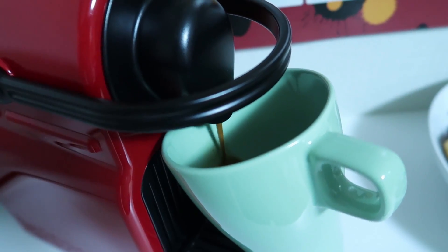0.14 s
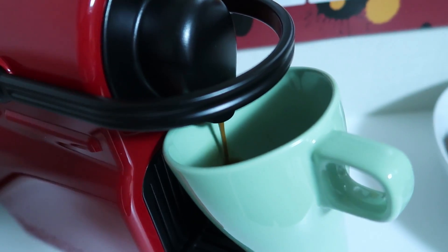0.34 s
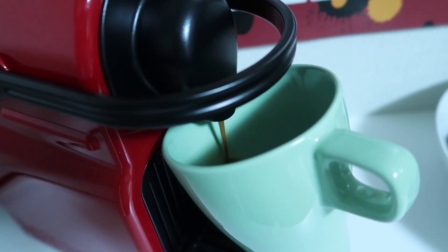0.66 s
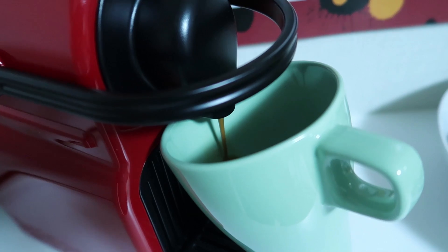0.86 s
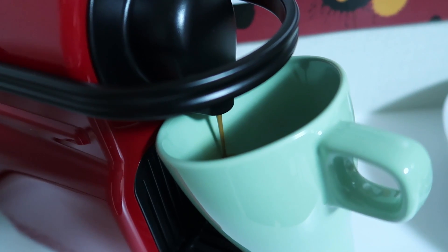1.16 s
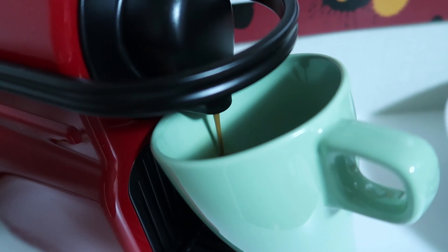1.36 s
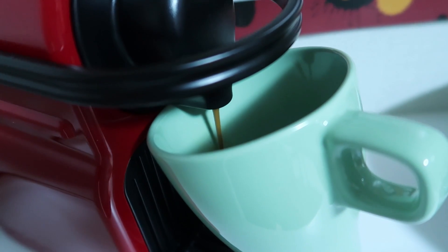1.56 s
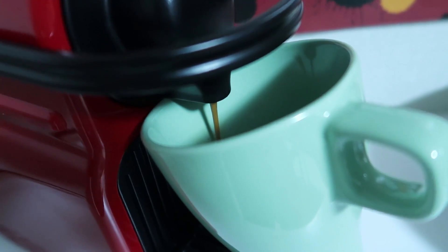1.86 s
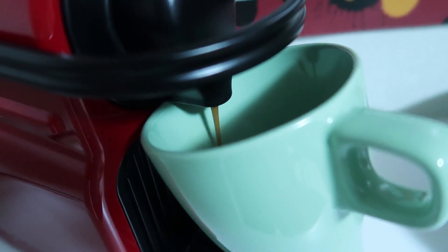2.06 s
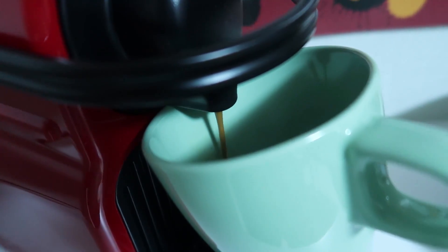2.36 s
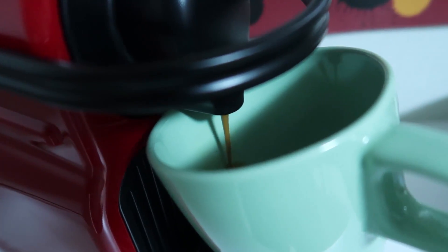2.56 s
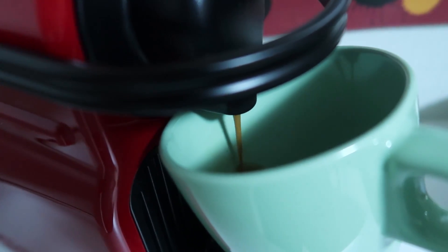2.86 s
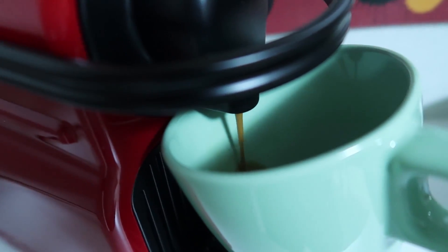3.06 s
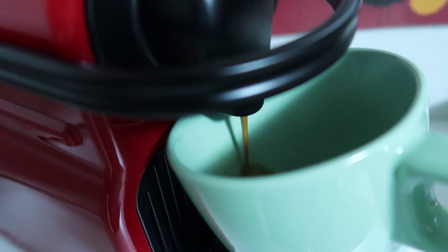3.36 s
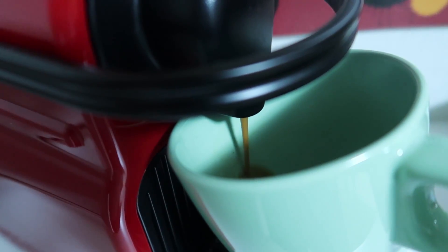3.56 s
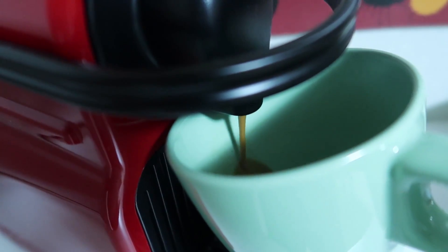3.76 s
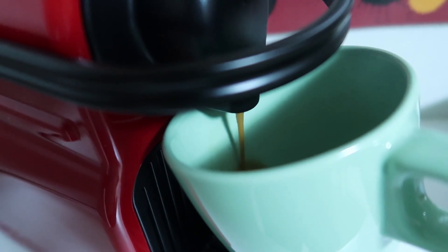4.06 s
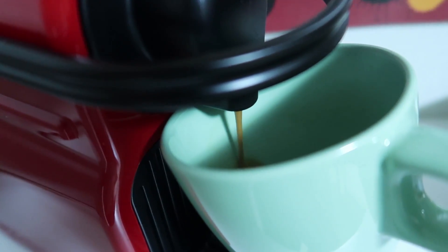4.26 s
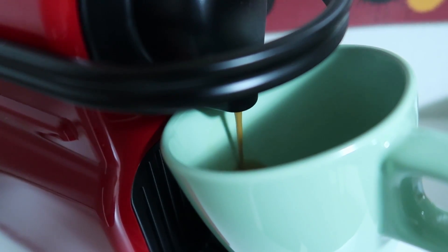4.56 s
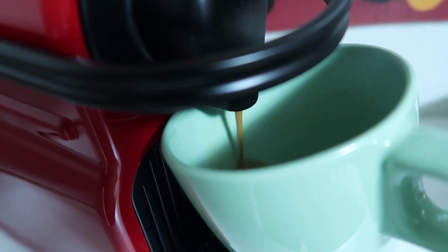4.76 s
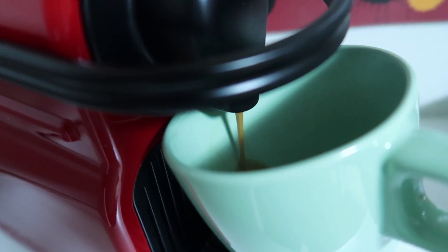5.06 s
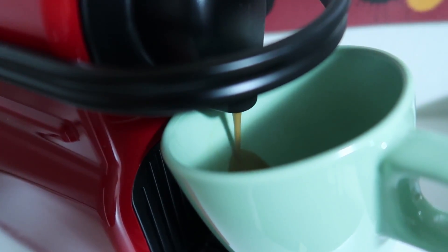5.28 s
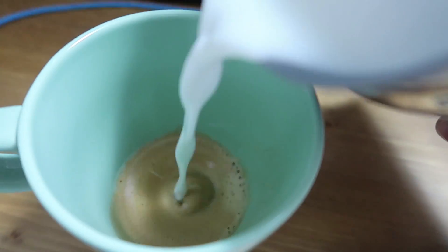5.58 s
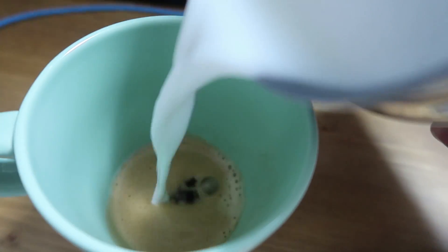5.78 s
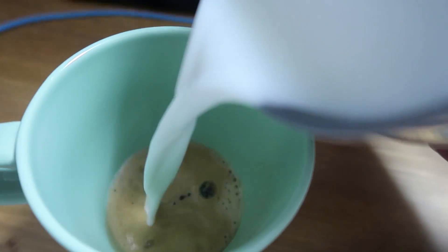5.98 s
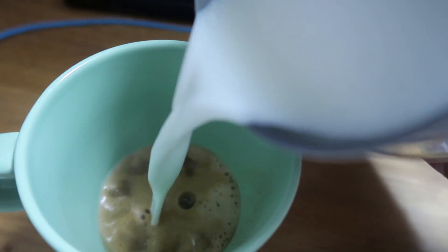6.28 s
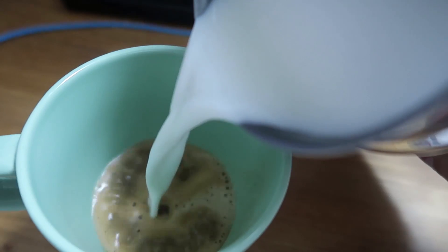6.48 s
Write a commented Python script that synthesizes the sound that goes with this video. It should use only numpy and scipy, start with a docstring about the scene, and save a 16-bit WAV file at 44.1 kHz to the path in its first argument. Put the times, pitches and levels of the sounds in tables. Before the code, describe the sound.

Close vibrating pump drone, rattling and hissing as coffee trickles into a mug; sudden cut to a hushed table, hollow knock, bubbly milk pouring.

```python
"""Capsule espresso, then milk.

A machine brews into a mug as the microphone creeps closer: the mains-driven piston pump sums sine harmonics
for hum and housing buzz, and noise gated per stroke for clatter and hiss; coffee gurgles as tone and spray, and spits.
Hard cut to a quiet kitchen table: milk plops into the coffee as rising bubble tones with noise splashes,
and a hollow knock bounces as decaying modes, over room tone."""
import sys
import numpy as np
from scipy import signal
from scipy.fft import rfft, irfft, next_fast_len
from scipy.io import wavfile

SR = 44100
rng = np.random.default_rng(int(sys.argv[2]) if len(sys.argv) > 2 else 0)


def unload_audio(sound):
    """Save the sound as a 16-bit wav file, at the path given as the first command line argument."""
    columns = np.transpose(np.atleast_2d(sound))
    # keep every value between -1 and 1, then stretch to whole-number steps
    steps = np.round(np.clip(columns, -1, 1) * 32767)
    wavfile.write(sys.argv[1], SR, steps.astype(np.int16))


N = 292383
T = np.arange(N) / SR
EARS = np.array([[1], [-1]])   # opposite sign in left and right

MAINS_HZ = 50.017   # one piston stroke per cycle
CUT_S, CUTOFF_HZ = 5.4513, 14800
FUNDAMENTAL_DB, ROOM_DB = -46.5, -46
SETTLE_S = 0.32   # time constant: pump labours, then settles as pressure builds
GURGLE_ATTACK_S, GURGLE_RELEASE_S = 0.019, 0.088
STREAM_DB = -48   # smooth stream between bouts
GUSH_ATTACK_S, GUSH_RELEASE_S = 0.02, 0.04
TRICKLE_DB = -70   # thin run between gushes
# small bubbles in a gush; level is relative to the patter
SMALL_BUBBLES_PER_S, SMALL_BUBBLE_DB, SMALL_SPREAD_DB = 30, 16, 2
SMALL_BUBBLE_HZ, SMALL_SPREAD_OCTAVES = 1180, 0.15

# microphone path: time_s, closeness_0_to_1
APPROACH = [(0, 0.12), (1.7, 0.43), (2.8, 0.66), (3.6, 0.82), (5.4, 0.86)]
# side over mid, machine: freq_hz, side_minus_mid_db
MACHINE_WIDTH = [(60, -52), (130, -45), (300, -14), (700, -16.5), (1400, -9), (2900, -8.5), (5000, -6),
                 (7000, -2), (9500, 2.5), (13000, 5)]
# side over mid, table: freq_hz, side_minus_mid_db
TABLE_WIDTH = [(60, -21), (110, -27), (200, -12), (370, -5), (670, -8), (1230, -2), (2240, -5), (4100, 0),
               (7490, 0.5), (13700, 6)]
# pump at twice the stroke rate: settled_far_db, start_gain_db, near_gain_db
DRONE_LEVELS = (-29, 4.8, -0.3)
# pump at four times the stroke rate: settled_far_db, start_gain_db, near_gain_db
HUM_LEVELS = (-21, 1.5, 1.9)
# clatter before trim: settled_far_db, start_gain_db, near_gain_db
CLATTER_LEVELS = (-35.5, 4, -0.76)
# hiss before trim: settled_far_db, start_gain_db, near_gain_db
HISS_LEVELS = (-39.5, 6, -9.5)
# weaker hum partials: stroke_rate_multiple, far_db, near_gain_db
WEAK_PARTIALS = [(3, -40.5, 1), (5, -46.5, 6.5), (6, -43.5, 4)]
# housing panels, each radiating in a lobe: freq_hz, width_hz, peak_db, loudest_closeness_0_to_1, off_lobe_loss_db
PANELS = [(349.6, 13, -39.5, 0.19, 8), (446.4, 36, -38, 0.76, 14.5), (504, 9.7, -28, .0, 11.5),
          (549.3, 17, -42, 0.54, 2), (600, 23, -37.5, 0, 19), (700, 22, -41.5, 0.22, 9),
          (750, 10, -40, 0.29, 15.5), (893, 17, -37, 0.54, 19), (955.5, 5.8, -36.5, 0.5, 2),
          (997.8, 5.7, -34.5, 0.15, 7), (1143, 47, -42.5, 0.19, 11), (1249, 51, -43, 0.61, 13.5),
          (1400, 20, -41, 0.21, 34), (1452, 11, -45, 1, 12), (1502, 70, -50, 1, 2),
          (1700, 12, -39.5, 0.46, 11), (1767, 39, -37, 0.26, 23), (1850, 64, -44, 0.37, 3),
          (2054, 34, -39.5, 0.23, 17), (2107, 36, -43, 0.85, 24), (2220, 51, -41.5, 0.75, 9.5),
          (2700, 17, -50, 0.44, 9)]
# pump clatter spectrum: freq_hz, relative_db_per_hz
CLATTER_SPECTRUM = [(25, -19.5), (60, 1), (200, -2), (370, -3.5), (480, 3.5), (800, -1), (930, 4),
                    (1080, -1.5), (1700, -0.5), (2200, -1.5), (2550, -5), (3300, -17), (4200, -18.5),
                    (8000, -53)]
# spectrum of water forced through the valve: freq_hz, relative_db_per_hz
HISS_SPECTRUM = [(800, -27), (2500, 2), (3000, 7.5), (4000, -1.5), (5400, -2), (6200, -8), (7400, -6),
                 (8400, -8.5), (9600, -11), (11200, -7.5), (12800, -11.5), (13600, -20), (15000, -33)]
# spout resonances excited by the hiss: freq_hz, width_hz, relative_db
SPOUT_MODES = [(3970, 70, -1.5), (4600, 130, -3), (5100, 110, -4.5), (5720, 110, -4), (7100, 130, -3.5),
               (7520, 64, -5), (11050, 60, -8), (12500, 200, -9)]
# loose parts shaken at the start: freq_hz, width_hz, start_db
LOOSE_PARTS = [(209, 14, -41), (455, 59, -79), (904, 10.4, -34), (1576, 36, -31)]
# coffee stream bouts: start_s, length_s, level_db, pitch_hz
GURGLES = [(0.916, 0.36, -42.5, 2985), (1.676, 0.28, -42.5, 2833), (2.132, 0.23, -41, 2852),
           (2.441, 0.167, -38.5, 2890), (3.129, .7, -40.5, 2976), (3.918, 0.1193, -40.5, 3050),
           (4.347, 0.2866, -44, 3045), (4.732, 0.35, -41.5, 3074)]
# spray around the stream tone: freq_hz, relative_db_per_hz
SPRAY_SPECTRUM = [(2000, -36.5), (2600, -7), (3000, -0.5), (3500, -2.5), (4200, -24), (6000, -28)]
# air spitting from the spout: start_s, peak_db
SPITS = [(0.1087, -43), (1.507, -35), (1.6467, -34), (1.8267, -35.5), (2.1066, -36.5), (2.185, -43),
         (2.7055, -31.5), (2.7862, -34), (3.9495, -41), (4.0041, -36.5), (4.907, -42)]
# spit puffs: freq_hz, relative_db_per_hz
SPIT_SPECTRUM = [(2000, -18), (4200, 6), (6000, 1.5), (9000, -8), (13000, -23), (15000, -24)]
# room tone: freq_hz, relative_db_per_hz
ROOM_SPECTRUM = [(20, -14), (35, -3), (50, -6), (65, -2), (95, -18), (135, -1), (175, -1.5), (230, -9.5),
                 (380, -9.5), (550, -18), (800, -16), (1650, -26), (3760, -31.5), (9500, -41.5),
                 (14000, -45)]
# loudest milk plops, levels before trim: start_s, bubble_db, bubble_hz, splash_db
PLOPS = [(5.632, -36, 1110, -45), (5.702, -30, 1290, -37), (5.733, -36, 1950, -36), (5.751, -30, 1090, -46),
         (5.7875, -24, 1250, -44), (5.794, -35, 1000, -42), (5.817, -34, 1310, -47),
         (5.837, -31, 1120, -48), (6.025, -35, 1100, -49), (6.046, -28.5, 1220, -47),
         (6.097, -39, 1080, -49), (6.118, -31, 1240, -49), (6.192, -34, 1100, -41), (6.265, -37, 1110, -50),
         (6.393, -31.5, 1090, -49), (6.470, -29.5, 1110, -42.5), (6.486, -36, 1190, -52),
         (6.5014, -29.5, 1050, -45), (6.5355, -23, 1160, -42.5)]
# milk splashes: freq_hz, relative_db_per_hz
SPLASH_SPECTRUM = [(900, 1), (1500, 6), (2100, -4), (2700, 6), (3250, 7), (3900, -21),
                   (7000, -25), (14000, -27)]
# milk leaving the jug: start_s, length_s, patter_db
GUSHES = [(5.73, 0.15, -57), (6.009, .11, -59), (6.157, .04, -59), (6.36, .04, -60), (6.457, .09, -56),
          (6.595, 0.031, -57)]
# air modes of the mug: freq_hz, width_hz, relative_db
MUG_MODES = [(1110, 140, 4), (1310, 150, 12), (1540, 200, -3), (2630, 350, -11), (3070, 240, -6.5)]
# knock and its bounces: start_s, relative_db, favoured_hz
KNOCKS = [(5.69, -10, 950), (5.722, -23, 750), (5.7337, -21, 330), (5.756, -25.5, 674)]
# modes the knock rings: freq_hz, relative_db, t60_s
KNOCK_MODES = [(139, -16.5, 0.39), (162.5, -21, 0.77), (352, -11, 0.28), (417, -14.5, 0.14),
               (644, -5, 0.11), (717, -8, 0.12), (712, -14, 0.13), (800, 1.5, 0.0087), (915, -13, 0.036),
               (960, -23, .03), (1075, 4.5, .012), (1166, -13, 0.082), (1240, -15, 0.028),
               (1380, -27, 0.13), (1900, -23, .15), (2013, -34, 0.13)]
# sharp click of the knock: freq_hz, relative_db_per_hz
CRACK_SPECTRUM = [(500, 9), (1500, 12), (3500, 0), (6000, -1.5), (10000, -8), (14000, -5)]


def from_db(db):
    """Decibels to gain."""
    return 10 ** (np.asarray(db) / 20)


def rms_one(x):
    """Scale to rms 1."""
    return x / np.sqrt(np.mean(x ** 2) + 1e-20)


def in_time(rows):
    """Each column of a curve at every sample."""
    time_s, *columns = np.transpose(rows)
    return [np.interp(T, time_s, column) for column in columns]


def at_hz(points, hz):
    """Read a spectrum on a log-frequency axis."""
    known_hz, values = np.transpose(points)
    return np.interp(np.log(hz + 1), np.log(known_hz), values)


def drift(rate_hz):
    """Slow chance with spread 1: low-passed noise at 1/40 of the sample rate, interpolated."""
    r = np.exp(-80 * np.pi * rate_hz / SR)
    noise = rng.standard_normal(N // 40 + 2002)
    slow = signal.lfilter([1], [1, -2 * r, r * r], noise)[2000:]   # drop the filter's start-up
    return np.interp(np.arange(N) / 40, np.arange(len(slow)), rms_one(slow))


def resonance(x, hz, width_hz):
    """Two-pole resonance with gain 1 on top."""
    r = np.exp(-np.pi * width_hz / SR)
    zeros = np.array([1, 0, -1]) * (1 - r * r) / 2
    poles = [1, -2 * r * np.cos(2 * np.pi * hz / SR), r * r]
    return signal.lfilter(zeros, poles, x + 1e-18)


def ring(hits, hz, t60_s):
    """A unit click sets a decaying sine of height 1 ringing."""
    r, w = from_db(-60 / (t60_s * SR)), 2 * np.pi * hz / SR
    return signal.lfilter([0, np.sin(w)], [1, -2 * r * np.cos(w), r * r], hits + 1e-18)


def band(x, low_hz, high_hz):
    """Gentle band-pass."""
    sos = signal.butter(2, [low_hz, min(high_hz, 0.45 * SR)], "band", fs=SR, output="sos")
    return signal.sosfilt(sos, x + 1e-18)


def stereo_noise(spectrum, width):
    """Coloured noise, mid and side mixed by frequency; rms 1."""
    size = next_fast_len(N)
    hz = np.arange(size // 2 + 1) * SR / size
    mid, side = rfft(rng.standard_normal((2, size))) * from_db(at_hz(spectrum, hz))
    spread = from_db(at_hz(width, hz))
    both = (mid + spread * side * EARS) / np.sqrt(1 + spread ** 2)
    return rms_one(irfft(both, size)[:, :N])


def clicks(times_s, levels_db):
    """One click for each event."""
    out = np.zeros(N)
    out[np.round(np.asarray(times_s) * SR).astype(int)] = from_db(levels_db)
    return out


def dying(x, t60_s):
    """Each click becomes an envelope that dies away."""
    return signal.lfilter([1], [1, -from_db(-60 / (t60_s * SR))], x + 1e-18)


def stroke_gate(peak_turn, depth_db, uneven_db):
    """A swell once per piston stroke, each of its own strength; rms 1."""
    turn = T * MAINS_HZ - peak_turn
    strength = rng.standard_normal(int(turn[-1]) + 4)[np.round(turn).astype(int) + 1]
    swell = ((1 + np.cos(2 * np.pi * turn)) / 2) ** 2
    return rms_one(from_db(swell * (depth_db + uneven_db * strength)))


def bouts(rows, attack_s, release_s, between_db):
    """Gain of a flow that swells, holds and falls back once per row."""
    gain = from_db(between_db) * np.ones(N)
    for start_s, length_s, level_db, *_ in rows:
        rise = (T - start_s) / attack_s
        fall = 1 - (T - start_s - length_s) / release_s
        gain = np.maximum(gain, from_db(level_db) * np.clip(np.minimum(rise, fall), 0, 1))
    return gain


def kitchen(x, t60_s, dull_hz):
    """Diffuse reflections: decaying band-passed noise, slightly different in each ear."""
    age_s = T[:SR // 2]
    noise = band(rng.standard_normal((2, SR // 2)), 150, dull_hz)
    mid, side = noise * from_db(-60 * age_s / t60_s)
    tail = (mid + 0.087 * side * EARS) * np.minimum(age_s / 0.0034, 1)
    tail = tail / np.sqrt(np.sum(tail ** 2) / 2)
    return signal.fftconvolve(x[None], tail, axes=1)[:, :N]


def pump_level(levels_db, closeness):
    """Level in dB: falls as the pump settles, changes as the microphone nears."""
    settled_db, start_db, near_db = levels_db
    return settled_db + start_db * np.exp(-T / SETTLE_S) + near_db * closeness


def hum(closeness, sway_db, ear_turn, beat_s, trough_s, beat_db):
    """Shaking pump body: mains multiples 2 and 4 lead; the fundamental swells and sinks."""
    def partial(multiple, db, apart_turn=0):
        turns = multiple * MAINS_HZ * T + rng.random() + apart_turn * EARS
        return from_db(db) * np.sqrt(2) * np.cos(2 * np.pi * turns)

    beat = -beat_db * np.cos(2 * np.pi * (T - trough_s) / beat_s)
    body = partial(1, FUNDAMENTAL_DB + beat)
    body = body + partial(2, pump_level(DRONE_LEVELS, closeness))
    body = body + partial(4, pump_level(HUM_LEVELS, closeness), ear_turn)
    for multiple, far_db, near_db in WEAK_PARTIALS:
        body = body + partial(round(multiple), far_db + near_db * closeness + sway_db * drift(1.9))
    return body


def housing(closeness, lobe, strike_turn, scatter_turn, rough, end_multiple):
    """Strokes shake the panels into mains harmonics; the microphone passes through the panels' lobes."""
    hz, width_hz, db, best, lost_db = np.transpose(PANELS)[:, :, None]
    path = np.linspace(0, 1, 40)
    heard = from_db(db - lost_db * (1 - np.exp(-((path - best) / lobe) ** 2)))
    out, lag_turn = 0, 0
    for multiple in range(7, end_multiple):
        response = 1 / (1 + (2 * (multiple * MAINS_HZ - hz) / width_hz) ** 2)
        gain = np.sqrt(np.sum(heard ** 2 * response ** 1.04, axis=0))
        # each harmonic peaks at its own moment of the stroke
        lag_turn += strike_turn + scatter_turn * rng.standard_normal()
        tone = np.cos(2 * np.pi * (multiple * MAINS_HZ * T - lag_turn))
        out = out + np.interp(closeness, path, gain) * tone
    return np.sqrt(2) * out * (1 + rough * drift(48))


def clatter(closeness):
    """Broadband pump noise, swelling unevenly on every stroke."""
    level_db = pump_level(CLATTER_LEVELS, closeness) + 1.5 + 0.51 * drift(8.7)
    noise = stereo_noise(CLATTER_SPECTRUM, MACHINE_WIDTH)
    return from_db(level_db) * noise * stroke_gate(0.42, 1.7, 0.87)


def spout(noise, ring_db):
    """Narrow spout resonances stand out of the noise."""
    rings = sum(from_db(db) * rms_one(resonance(noise, hz, width_hz)) for hz, width_hz, db in SPOUT_MODES)
    return rms_one(noise + from_db(ring_db) * rms_one(rings))


def hiss(closeness):
    """Each stroke forces water through the valve: treble noise coloured by the spout."""
    level_db = pump_level(HISS_LEVELS, closeness) + 1 + 0.5 * drift(11)
    noise = spout(stereo_noise(HISS_SPECTRUM, MACHINE_WIDTH), ring_db=-12)
    return from_db(level_db) * noise * stroke_gate(0.61, 5.8, 2.3)


def loose_parts(settle_s):
    """Stroke-gated noise shakes resonant parts at a limited swing; they settle as pressure builds."""
    shake = rng.standard_normal(N) * stroke_gate(0.63, 10, 1)
    out = 0
    for hz, width_hz, db in LOOSE_PARTS:
        swing = rms_one(resonance(shake, hz, width_hz))
        limited = np.tanh(2 * swing)
        out = out + from_db(db) * rms_one(resonance(limited, hz, 2 * width_hz))
    return np.exp(-T / settle_s) * out * from_db(2 * np.tanh(drift(31)))


def coffee_stream(wander_hz, burst_db, ping_turn, spray_db):
    """Each stroke pushes a spurt: a wavering tone, its pitch led by the bouts, inside wider spray."""
    pitch_hz, = in_time([(start_s + length_s / 2, pitch) for start_s, length_s, _, pitch in GURGLES])
    wavering_hz = pitch_hz + wander_hz * drift(70)
    ping = np.sqrt(2) * np.cos(2 * np.pi * np.cumsum(wavering_hz) / SR)
    spray = from_db(spray_db) * stereo_noise(SPRAY_SPECTRUM, MACHINE_WIDTH)
    spurts = stroke_gate(ping_turn, 8, 2) * from_db(burst_db * np.tanh(drift(32)))
    flow = bouts(GURGLES, GURGLE_ATTACK_S, GURGLE_RELEASE_S, STREAM_DB)
    return flow * rms_one((ping + spray) * spurts)


def spits(t60_s):
    """Air puffs at the spout: bright noise under short decays."""
    start_s, db = np.transpose(SPITS)
    return dying(clicks(start_s, db), t60_s) * stereo_noise(SPIT_SPECTRUM, MACHINE_WIDTH)


def machine():
    """Sum of everything the running pump drives."""
    closeness, = in_time(APPROACH)
    body = hum(closeness, sway_db=-0.7, ear_turn=0.0038, beat_s=1.47, trough_s=0.37, beat_db=4)
    buzz = housing(closeness, lobe=0.33, strike_turn=0.44, scatter_turn=0.2613, rough=0.068, end_multiple=64)
    noises = clatter(closeness) + hiss(closeness) + loose_parts(settle_s=1.24)
    coffee = coffee_stream(wander_hz=50, burst_db=6.5, ping_turn=0.59, spray_db=-2) + spits(t60_s=0.054)
    return body + (buzz + noises + coffee) * from_db(0.3 * EARS)   # slightly left


def room_tone():
    """Steady wide noise, strongest in the bass."""
    return from_db(ROOM_DB) * stereo_noise(ROOM_SPECTRUM, TABLE_WIDTH)


def gush_bubbles(count):
    """Each gush traps small bubbles at uneven intervals: rows start_s, level_db, pitch_hz."""
    rows = []
    for start_s, length_s, patter_db in GUSHES:
        ages_s = (np.arange(count) + rng.random(count)) / SMALL_BUBBLES_PER_S
        for age_s, (size, pitch) in zip(ages_s, rng.standard_normal((count, 2))):
            if age_s < length_s and start_s + age_s < T[-1]:
                hz = SMALL_BUBBLE_HZ * 2 ** (SMALL_SPREAD_OCTAVES * pitch)
                db = patter_db + SMALL_BUBBLE_DB + SMALL_SPREAD_DB * size
                rows.append((start_s + age_s, db, hz))
    return rows


def bubble_tones(trim_db, cycles, rise_per_s, swell_s):
    """Trapped air rings as a short rising sine, losing 60 dB in a set count of cycles."""
    out, age_s = np.zeros(N), T[:SR // 20]
    for start_s, db, hz, *_ in PLOPS + gush_bubbles(count=8):
        decay = from_db(db + trim_db - 60 * age_s * hz / cycles)
        tone = np.sin(2 * np.pi * hz * age_s * (1 + rise_per_s * age_s)) * decay
        start = round(start_s * SR)
        out[start:start + len(age_s)] += (tone * (1 - np.exp(-age_s / swell_s)))[:N - start]
    return out


def splashes(trim_db):
    """A short decaying noise burst for each plop."""
    start_s, _, _, db = np.transpose(PLOPS)
    return dying(clicks(start_s, db + trim_db), 0.012) * stereo_noise(SPLASH_SPECTRUM, TABLE_WIDTH)


def patter(drops_per_s):
    """Small drops, as random impulses, excite the air modes of the mug."""
    drops = (rng.random(N) < drops_per_s / SR) * rng.standard_normal(N)
    rings = sum(from_db(db) * resonance(drops, hz, width_hz) for hz, width_hz, db in MUG_MODES)
    return bouts(GUSHES, GUSH_ATTACK_S, GUSH_RELEASE_S, TRICKLE_DB) * rms_one(rings)


def milk():
    """Bubbles and splashes with reflections, plus dry patter."""
    bubbles = bubble_tones(trim_db=-0.5, cycles=18, rise_per_s=2.7, swell_s=0.00026)
    splash = splashes(trim_db=4.5)
    reflections = from_db(-9.5) * kitchen(bubbles + splash[0], t60_s=0.073, dull_hz=5100)
    return bubbles + splash + patter(drops_per_s=2100) + reflections


def knock(focus_db, contact_hz, click_db, click_t60_s):
    """Hollow knock: low-passed ringing modes after a sharp click; each bounce favours other modes."""
    start_s, db, favoured_hz = np.transpose(KNOCKS)
    body = 0
    for k, (hz, mode_db, t60_s) in enumerate(KNOCK_MODES):
        away_octaves = np.minimum(np.abs(np.log2(hz / favoured_hz)), 1)
        hits = clicks(start_s, db + mode_db - focus_db * away_octaves)
        body = body + (-1) ** k * ring(hits, hz, t60_s)
    body = signal.sosfilt(signal.butter(2, contact_hz, fs=SR, output="sos"), body)
    crack = dying(clicks(start_s[:1], click_db), click_t60_s) * stereo_noise(CRACK_SPECTRUM, MACHINE_WIDTH)
    return body + crack + from_db(-13.5) * kitchen(body + crack[0], t60_s=0.4, dull_hz=8000)


def scene():
    """The machine, then a hard cut to the table."""
    bump = knock(focus_db=7.5, contact_hz=1900, click_db=-19.5, click_t60_s=0.006)
    table = room_tone() + milk() + bump
    return np.where(T < CUT_S, machine(), table)


def record(dry):
    """Steep low-pass cuts the top."""
    return signal.sosfilt(signal.cheby2(14, 60, CUTOFF_HZ, fs=SR, output="sos"), dry)


dry = scene()
out = record(dry)
unload_audio(out)
```